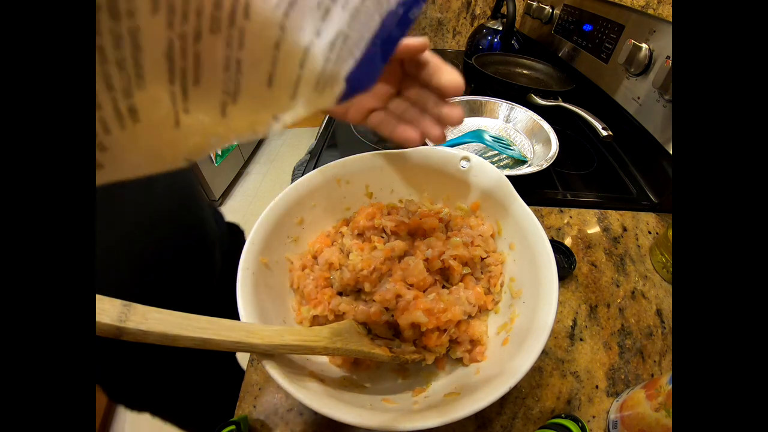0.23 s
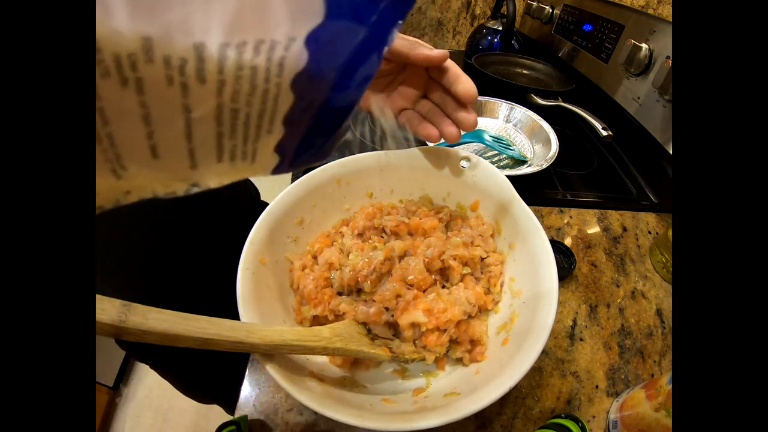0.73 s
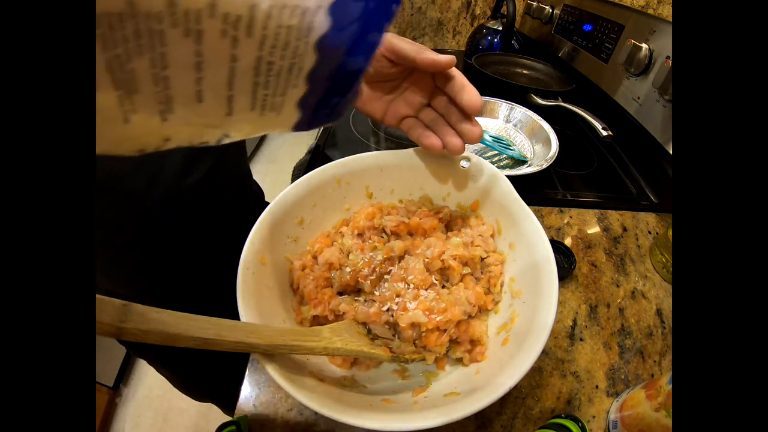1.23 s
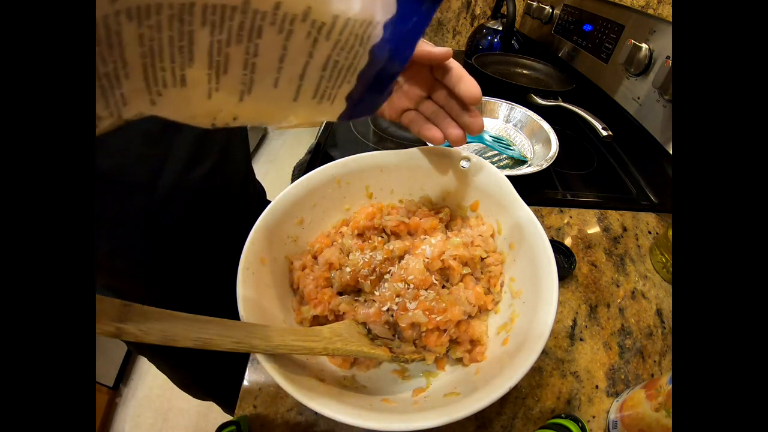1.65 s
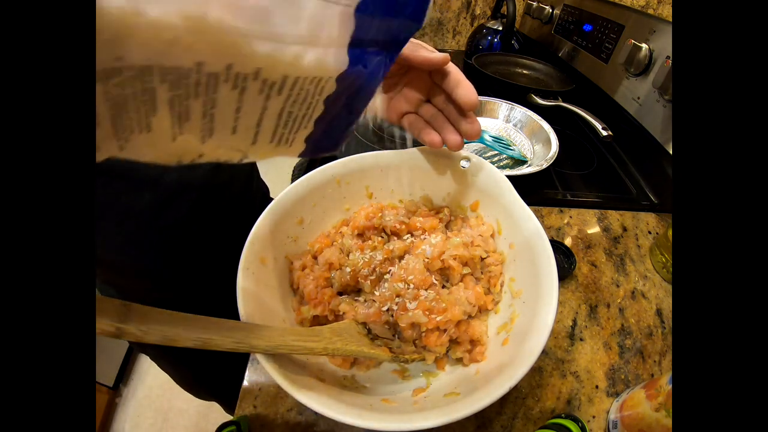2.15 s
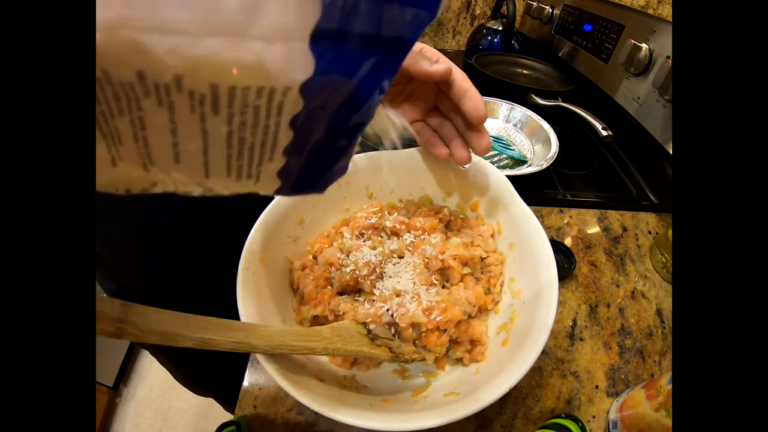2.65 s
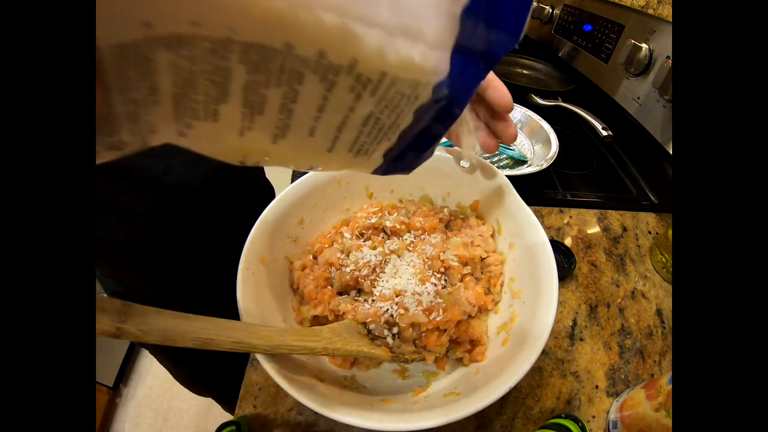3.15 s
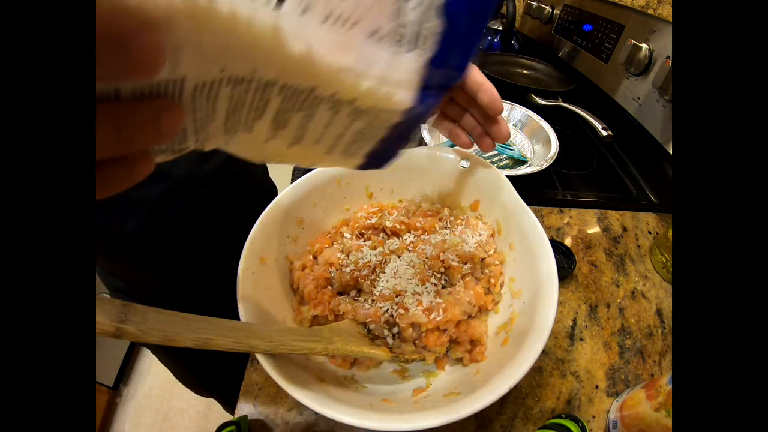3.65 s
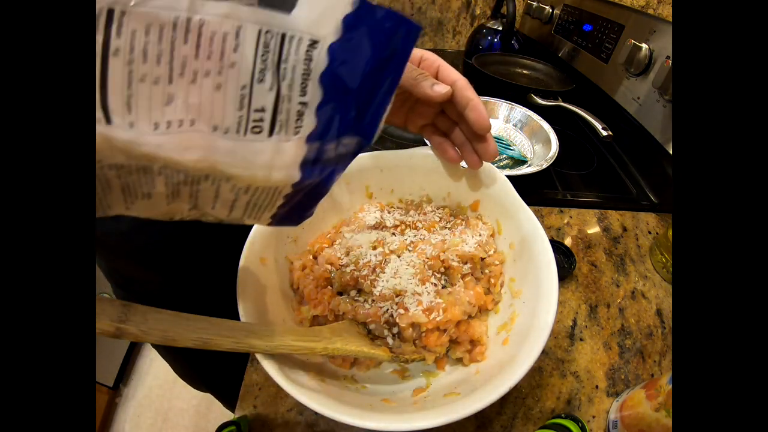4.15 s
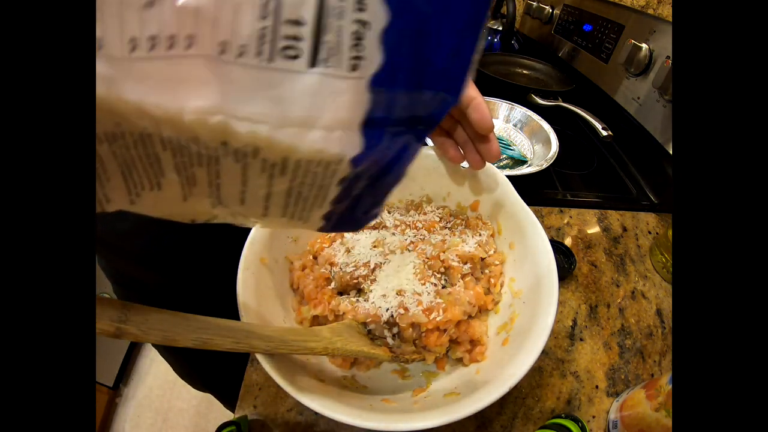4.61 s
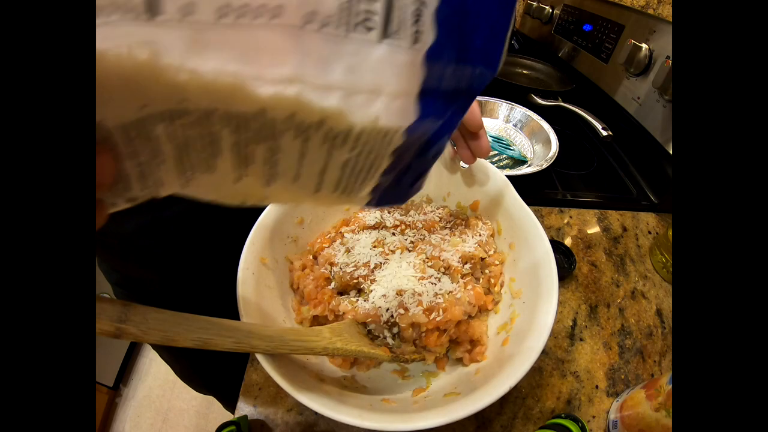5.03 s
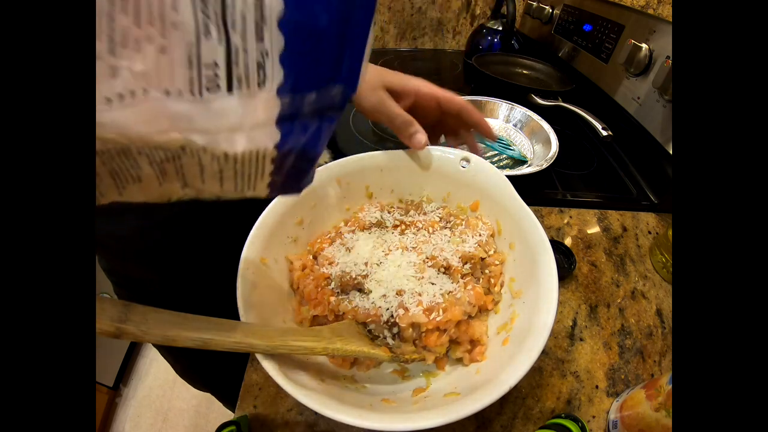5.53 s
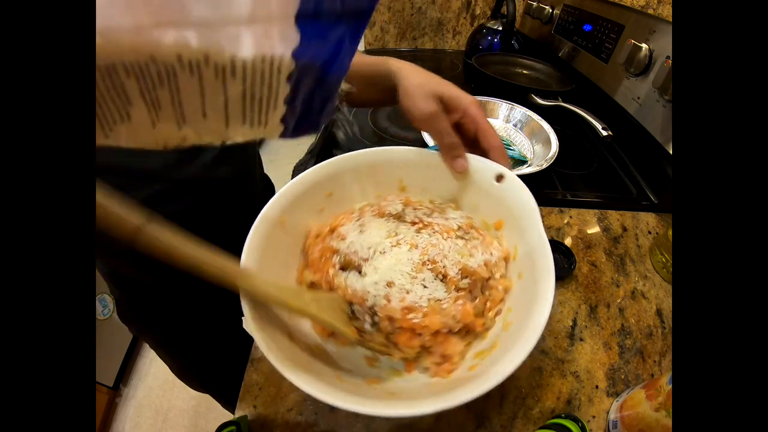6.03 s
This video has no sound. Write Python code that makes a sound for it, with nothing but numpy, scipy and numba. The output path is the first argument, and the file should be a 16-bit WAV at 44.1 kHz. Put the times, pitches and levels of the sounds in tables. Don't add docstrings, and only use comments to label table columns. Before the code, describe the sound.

Very close to a small stereo microphone, a stiff plastic bag of dry crumbs is shaken on the left: dense bright crackle, sharp snaps and a brief low handling rumble. It drifts toward the front and softens into lighter rustling and sprinkling. A low appliance drone swells and fades underneath. Late on, a crumb ticks the bowl rim, then a few small rattly clicks follow.

```python
import sys
import numpy as np
from scipy import signal
from scipy.fft import rfft, irfft, next_fast_len
from scipy.io import wavfile
from scipy.ndimage import uniform_filter1d, map_coordinates
from numba import njit

SR = 44100
rng = np.random.default_rng(int(sys.argv[2]) if len(sys.argv) > 2 else 0)


def master(y):
    cut = np.clip(np.atleast_2d(y).T, -1, 1)
    pcm = np.round(cut * 32767)
    wavfile.write(sys.argv[1], SR, pcm.astype(np.int16))


def convert_level_to_amplitude(level_db):
    exponent = np.asarray(level_db, float) / 20
    return 10 ** exponent


N = 276507
TIME = np.arange(N) / SR
SIZE = next_fast_len(N + 8192)
LOG_HZ = np.log(np.arange(SIZE // 2 + 1) * SR / SIZE + 1)
MIRROR = np.array([[1], [-1]])
STOP_S = 6.2495

# [start t/s, end t/s, start level/dB, end level/dB, big-fold share/dB]
POUR_TABLE = [(-.02, 0.07, -29.5, -37, 7), (0.066, 0.225, -33.5, -35.5, 2.5),
              (.242, 0.533, -36.5, -37, 1.5), (0.543, 0.86, -39, -40.5, 2.5), (0.834, 1.4, -41.5, -47, 3),
              (1.4, 1.762, -38, -45.5, 4.5), (1.763, 1.816, -47, -41.5, 2), (1.807, 1.906, -39, -38, 3.5),
              (1.936, 2.733, -43, -41.5, 1), (2.714, 2.873, -47.5, -49.5, -2),
              (2.946, 3.066, -55, -65, -0.5), (3.07, 3.338, -51.5, -49, 1), (3.354, 4.033, -50.5, -53, -1),
              (4.036, 4.527, -47, -47, -4), (4.53, 4.65, -52, -48.5, 0), (4.66, 4.811, -46.5, -44.5, 1.5),
              (4.805, 4.858, -51.5, -55, 8), (4.86, 4.984, -47.5, -52, -6),
              (4.962, 5.404, -42, -43.5, -0.5), (5.415, 5.686, -42, -49, -14),
              (5.682, 5.747, -53, -54, -21), (5.744, 5.847, -53, -45, -13), (5.855, 5.93, -43, -52.5, -2),
              (5.93, 6.025, -54.5, -51.5, 2), (6.026, 6.3, -46, -58, -0.5)]
# [t/s, peak level/dB, rise t/s per 10 dB, fall t/s per 10 dB]
JOLT_TABLE = [(.1, -33, 0.022, 0.34), (.15, -30.5, 0.059, 0.04), (.2, -32, 0.081, 0.026),
              (.305, -34, .01, 0.061), (.5, -34, .015, 0.025), (0.269, -27.5, 0.056, 0.075),
              (.45, -27.5, 0.072, 0.14), (.572, -28, 0.03, 0.044), (.69, -30.5, 0.033, 0.092),
              (.8, -34.5, 0.014, 0.042), (.93, -36, 0.046, 0.073), (1.044, -40, 0.076, 0.097),
              (1.13, -43.5, 0.066, 0.075), (1.99, -30, 0.073, 0.095), (2.09, -35.5, .04, 0.044),
              (2.13, -32.5, 0.06, 0.065), (2.228, -32, 0.034, 0.046), (2.243, -43, .015, .01),
              (2.348, -35, 0.056, 0.082), (2.422, -37, 0.023, 0.023), (2.49, -34.5, 0.025, 0.063),
              (2.624, -40.5, 0.049, 0.076), (3.1, -44.5, .02, 0.059), (3.21, -43.5, 0.22, 0.057),
              (3.379, -39.5, 0.014, 0.0046), (3.535, -34, 0.084, 0.022), (3.612, -38.5, 0.038, 0.027),
              (3.73, -35.5, 0.13, 0.38), (3.88, -40.5, 0.057, 0.023), (4.085, -41.5, 0.067, 0.035),
              (4.262, -42, 0.06, 0.056), (4.358, -39.5, 0.028, 0.18), (4.982, -49, .01, 0.027),
              (5.066, -41, 0.039, .01), (5.135, -37, 0.014, 0.055), (5.185, -38.5, .04, 0.013),
              (5.225, -42, .012, 0.045), (5.32, -41.5, 0.021, 0.071), (6.15, -44, 0.015, 0.32)]
# [t/s, hollow f/Hz, fine-crumb level/dB]
HOLLOW_TABLE = [(0, 3500, 1), (.15, 3700, 1.5), (.42, 3450, 1), (.47, 2570, 0.5), (.57, 3900, -0.5),
                (.64, 4500, 4), (.71, 2494, 0.5), (.81, 4100, 2), (.87, 3420, 0), (1.4, 2980, -1),
                (1.6, 3500, -0.5), (1.95, 2800, -0.5), (2.03, 3470, -1), (2.12, 3180, 0.5),
                (2.36, 3800, -0.5), (2.9, 3370, -1.5), (3.1, 2590, -0.5), (3.4, 3000, 1), (4.9, 3020, -1.5),
                (5.05, 3500, -3), (5.15, 3870, 1.5), (5.33, 3180, -3), (5.52, 3300, -0.5), (5.6, 3620, 1),
                (6.1, 2500, -4)]
# [t/s, peak level/dB, f/Hz, low thud level/dB]
SNAP_TABLE = [(0.055, -23, 4520, -24), (0.076, -16, 1450, -26), (0.0996, -15, 3130, -35),
              (0.2662, -17, 5740, -45), (0.548, -38, 3930, -34), (0.794, -20, 3800, -38),
              (0.836, -29, 3300, -24), (0.995, -26.5, 3250, -17.5), (1.0446, -13.5, 3320, -49),
              (1.118, -22, 4040, -45), (1.4836, -18, 3310, -39), (1.704, -29, 1240, -27),
              (1.8526, -26, 4070, -36), (1.991, -25, 2490, -41), (2.2198, -26.5, 3070, -15),
              (2.348, -28, 3700, -14.5), (2.4145, -43, 4000, -27), (2.473, -23, 3390, -35),
              (3.0924, -26, 2080, -39), (3.4512, -35.5, 2960, -14), (3.53, -17, 3600, -43),
              (3.6737, -18, 2680, -44), (3.884, -20, 2350, -47), (4.1867, -35, 3890, -30),
              (4.363, -27, 2780, -44), (4.977, -26, 1610, -44), (5.0456, -29, 3370, -37),
              (5.41, -29, 3200, -28), (5.461, -36, 2590, -40)]
# [t/s, peak level/dB]
CRACK_TABLE = [(.2404, -19), (.9052, -23), (1.2406, -28), (1.3907, -23), (1.5352, -22), (1.6226, -23),
               (1.7767, -35), (1.7993, -28), (1.94, -29), (2.3374, -22), (2.5757, -27), (2.592, -19),
               (2.6187, -23.5), (3.068, -23.5), (3.212, -19.5), (3.3624, -43.5), (3.4107, -21), (3.58, -24),
               (3.611, -34), (4.048, -37), (4.2397, -32), (4.5082, -27), (4.672, -27), (4.756, -25),
               (4.8647, -24.5), (5.088, -34), (5.1303, -19), (5.2165, -36), (5.357, -22), (5.7846, -32)]
# [t/s, peak level/dB, f/Hz]
POP_TABLE = [(0.0595, -23, 3700), (0.0758, -14, 3600), (0.1006, -12, 4400), (0.2543, -19, 3700),
             (0.2723, -19, 3000), (0.2756, -18, 2900), (0.3341, -21, 2800), (0.377, -23, 4700),
             (0.398, -23, 3800), (0.4013, -20, 3900), (0.4281, -20, 4800), (0.5095, -23, 3400),
             (0.5562, -21, 4200), (0.584, -21, 3400), (0.5952, -22, 4200), (0.638, -24, 5100),
             (0.7386, -23, 5100), (0.7649, -28, 4000), (0.7937, -23, 3800), (0.7978, -26, 3800),
             (0.8029, -26, 4000), (0.8103, -26, 3600), (0.9468, -27, 3100), (0.9537, -27, 3600),
             (0.959, -27, 2700), (0.9964, -30, 1700), (1.0411, -28, 3500), (1.0461, -26, 2500),
             (1.1188, -28, 3500), (1.1291, -27, 3300), (1.1858, -33, 3300), (1.24, -34, 3000),
             (1.2444, -35, 3500), (1.2984, -34, 2100), (1.3457, -34, 4000), (1.4848, -28, 5000),
             (1.5524, -29, 3300), (1.6239, -26, 4500), (1.6354, -28, 4200), (1.706, -30, 2100),
             (1.7361, -33, 2100), (1.7786, -32, 4700), (1.9911, -22, 2900), (2.1693, -28, 3700),
             (2.1839, -29, 3700), (2.2221, -29, 2300), (2.2601, -29, 3200), (2.3373, -16, 3600),
             (2.3501, -19, 3600), (2.4155, -33, 4400), (2.4737, -28, 3300), (2.5784, -28, 3300),
             (2.5924, -29, 4600), (2.6195, -27, 3300), (2.65, -30, 4000), (2.7258, -31, 4400),
             (2.7769, -37, 4700), (2.9165, -45, 4700), (3.0259, -39, 3100), (3.0694, -35, 4200),
             (3.0878, -35, 2500), (3.0942, -28, 2900), (3.1042, -31, 3000), (3.115, -33, 2700),
                 (3.1829, -33, 2900), (3.2134, -29, 4600), (3.2212, -30, 3500), (3.2393, -36, 3600),
                 (3.2453, -32, 3900), (3.2501, -37, 5100), (3.3443, -39, 5800), (3.3641, -34, 4000),
                 (3.3722, -34, 3800), (3.3787, -28, 5600), (3.4106, -29, 4700), (3.5304, -23, 3600),
                 (3.5815, -30, 2900), (3.6124, -28, 2600), (3.6742, -27, 4000), (3.7738, -26, 2600),
                 (3.8825, -27, 4400), (3.9131, -30, 3900), (4.1887, -33, 2800), (4.241, -34, 3400),
                 (4.3391, -32, 3300), (4.3625, -29, 4000), (4.4078, -30, 3800), (4.4263, -31, 3100),
                 (4.5088, -31, 3100), (4.608, -36, 4100), (4.6447, -39, 3700), (4.6746, -36, 5000),
                 (4.6947, -35, 3400), (4.7106, -34, 4600), (4.7572, -33, 3100), (4.7722, -35, 3000),
                 (4.7997, -35, 2100), (4.8112, -38, 3000), (4.9784, -33, 4500), (4.9848, -33, 2700),
                 (5.0471, -28, 3800), (5.0605, -32, 2600), (5.0674, -29, 3400), (5.089, -32, 3700),
                 (5.1117, -33, 3400), (5.1318, -25, 4000), (5.1367, -27, 4200), (5.1654, -28, 3200),
                 (5.36, -31, 3700), (5.3925, -33, 3200), (5.4612, -33, 3000), (5.7858, -36, 4500),
                 (6.1484, -33, 3100), (6.1581, -35, 2900), (6.1636, -35, 3300), (6.1689, -32, 2800)]
# [t/s, peak level/dB, f/Hz]
FOLD_TABLE = [(1.046, -37, 1370), (1.296, -38, 1360), (1.413, -29, 1750), (1.435, -38, 1030),
              (1.497, -37, 1410), (1.705, -31, 1300), (1.734, -44.5, 1970), (1.82, -33, 1960),
              (1.854, -36, 972), (1.887, -32, 695), (2.175, -38, 1290), (2.472, -37, 1400),
              (2.573, -35, 1830), (3.092, -35, 2000), (3.363, -49, 1690), (3.577, -36, 1650),
              (3.699, -37, 1840), (4.798, -34, 1500), (4.967, -37, 1620), (4.984, -38, 1670),
              (5.129, -37, 1590), (5.147, -37, 1650)]
# [t/s, f/Hz, level/dB, t60/s]
KNOCK_TABLE = [(.0757, 2600, -16, .002), (.0762, 1350, -15, .006), (5.7222, 2400, -38, .007),
               (.1003, 3500, -18, .005), (.1003, 4800, -19, .0045), (.1004, 6800, -17, .003),
               (.9955, 420, -30, .02), (2.2217, 680, -23, .02), (2.2217, 880, -27, .008),
               (2.2217, 1400, -29, .008), (2.2217, 400, -24, .02), (2.3495, 700, -30, .01),
               (2.4155, 300, -24, .03), (2.4155, 600, -23, .015), (3.0694, 7600, -35, .002),
               (3.2455, 7200, -36, .002), (3.3787, 7300, -30, .003), (3.4106, 8200, -30, .0015),
               (6.150, 2700, -33, .006), (6.1555, 2900, -37, .006), (6.159, 3400, -34, .004),
               (6.1625, 3300, -35, .005), (6.169, 2200, -38, .012), (6.183, 780, -38, .05),
               (6.1845, 2400, -33, .003), (6.1912, 2300, -33, .003), (6.2, 2300, -34, .004),
               (6.05, 2300, -42, .012), (6.09, 2200, -41, .015)]
# [t/s, position: 1 left, 0 front]
BAG_PATH = [
    (0, 1),
    (1.3, 1),
    (2.3, 0.66),
    (3.5, 0.28),
    (5, 0.29),
    (6.27, 0.1),
]
# [f/Hz, level/dB per Hz]
FILM_COLOUR = [(110, -12.5), (280, -7.5), (600, -4.5), (1100, 2), (1900, 6.5), (3300, 6.5), (5500, 5),
               (7300, 7.5), (8300, 3.5), (9400, 0), (10800, -9), (13500, -16), (15300, -22), (16500, -44)]
# [f/Hz, left-right level/dB from left, same from front, left lead/rad from left, same from front,
# direct share/0-1]
PORT_PAIR = [(150, 3, 0, 0, 0, .92), (450, 7, 1, .1, .2, .7), (800, 8, 2, -1, 0, .45),
             (1150, 9, 5, -1.8, -.6, .8), (2000, 7, 2, -1.3, -.4, .56), (4100, 4, 1, 0, 0, .87),
             (6000, 3, -1, 2, 1, .6), (8100, -2, -6, 3.1, 2.4, .5), (9000, 8, 4, 3.8, 3.2, .5),
             (12000, 4, 2, 5.3, 4, .35), (15000, 5, 3, 7.5, 5, .3)]
# [f/Hz, level/dB, t60/s]
RIM_MODES = [(2330, -38, .02), (3500, -32, .008), (4700, -33, .002), (5200, -26, .0007), (6000, -32, .002),
             (7700, -31, .004), (8700, -42, .015), (10500, -50, .001), (14700, -44, .001)]
# [t/s, level/dB, f/Hz, t60/s]
BUMP_TABLE = [(0.057, -43, 200, 0.17), (0.077, -34, 207, 0.12), (0.089, -36.5, 84.7, 0.16),
              (.1, -41, 270, .06), (0.171, -41, 32, 0.16), (3.7, -66, 65, .3), (5.49, -65, 75, .15)]
# [t/s, level/dB]
GRIP_TABLE = [(0.0, -57), (.088, -45.5), (.3, -52), (.45, -50.5), (.6, -53.5), (.706, -55.5)]
# [t/s, level/dB]
PUFF_TABLE = [(0.0, -69), (.19, -57), (.34, -59), (.54, -66), (.96, -61), (1.14, -63), (1.29, -66),
              (1.96, -75), (2.49, -71), (3.1, -83), (3.76, -80), (5.08, -84), (5.5, -81), (5.73, -84)]
# [f/Hz, level/dB per Hz, port likeness/0-1]
HISS_COLOUR = [(20, -16, 0.7), (60, -14, 0.6), (127, -14.5, 0.7), (258, -3, 0.98), (373, 0, 0.73),
               (520, -8.5, 0), (690, 1.5, 0), (990, -10.5, 0), (3020, -10, 0), (8000, -15, 0.7),
               (11500, -31, 0), (16000, -42, .1)]
# [t/s, level/dB]
DRONE_TABLE = [(.09, -63), (1.02, -68), (1.55, -64), (1.69, -60), (2.14, -58), (2.372, -59), (2.49, -55),
               (2.79, -54), (3.1, -58), (3.3, -62), (3.43, -52.5), (3.69, -57), (3.81, -53), (3.97, -52),
               (4.2, -57), (4.75, -62), (5.2, -77), (5.6, -67), (5.83, -61), (6.08, -57)]


def rustle(patch, moves, count=130000, gain_db=-7.5):
    scatter_db, rarest, patchy_db = 3.1, 0.011, 1.9
    taut_from_db, taut_per_db, slack_hz, slack_octaves = -38.5, -0.5, 2160, 0.52
    fold_per_jolt, crumb_per_jolt, crumb_per_db = 0.21, -0.13, 0.024
    hollow_db, hollow_per_jolt, hollow_octaves = 3.0, 0.17, 0.32

    when, pitch, luck, turn, stiff = rng.random((count, 5)).T
    cycles = 5 * 6.5 ** stiff ** 1.4
    row, column = when * (len(patch) - 1), np.sqrt(pitch) * (patch.shape[1] - 1)
    level_db, jolt_db, fold_db = moves[:, (when * N).astype(int)]
    t_s, hz = when * N / SR, (12 + 116 * pitch) ** 2
    fold = np.clip(np.log2(2000 / hz), 0, 1)
    crumb = np.clip(np.log2(hz / 5000) * 2, 0, 1)
    above_db = level_db - taut_from_db

    db = patchy_db * map_coordinates(patch, [row, column], order=1)
    db += level_db - scatter_db * np.log(luck + rarest)
    db += fold * (fold_db + fold_per_jolt * jolt_db)
    db += crumb * (2.5 + crumb_per_jolt * jolt_db + crumb_per_db * above_db)
    slack = np.exp(-(np.log2(hz / slack_hz) / slack_octaves) ** 2)
    db += taut_per_db * np.clip(above_db, 0, None) * slack

    shape_s, hollow_hz, fine_db = np.transpose(HOLLOW_TABLE)
    octaves = np.log2(hz / np.interp(t_s, shape_s, hollow_hz))
    db += (hollow_db + hollow_per_jolt * jolt_db) * np.exp(-(octaves / hollow_octaves) ** 2)
    db += crumb * np.interp(t_s, shape_s, fine_db)
    size = (hz / 3000) ** 0.75 * np.sqrt(11 / cycles)
    return ring(t_s, hz, cycles / hz, np.exp(2j * np.pi * turn) * convert_level_to_amplitude(db + gain_db) * size)


def patches(rate_hz, count, wake=0.14, linger=0.8):
    turn, size = rng.random((2, int(rate_hz * N / SR) + 2, count))
    awake = signal.lfilter([1], [1, -linger], (turn < wake) * (size + 1.2), axis=0)
    return (awake - awake.mean()) / awake.std()


def motion(time=TIME[::32]):
    edge_s, rest_db = 0.018, -62
    start, end, first_db, last_db, fold_db = np.transpose(POUR_TABLE)[:, :, None]
    on = np.clip(np.minimum(time - start, end - time) / edge_s + 0.5, 0, 1)
    pour_db = first_db + (last_db - first_db) * (time - start) / (end - start)
    power = on * convert_level_to_amplitude(2 * pour_db * (on > 0))
    slide = np.interp(TIME, time, power.sum(axis=0) + convert_level_to_amplitude(2 * rest_db))
    slide_db = 10 * np.log10(slide)
    both_db = 10 * np.log10(slide + swells(*np.transpose(JOLT_TABLE)))
    return both_db, both_db - slide_db, np.interp(TIME, time, np.sum(on * fold_db, axis=0))


def snaps(count=24, spread_s=0.0017, tail_db=-15, cycles=17.0, thud_hz=520):
    crack_hz, crack_thud_db = 3140, -61
    cracks = [(s, db, crack_hz, crack_thud_db) for s, db in CRACK_TABLE]
    s, peak_db, _, thud_db = np.transpose(SNAP_TABLE + cracks)
    s = s + 0.0008
    chance = rng.random((len(s), 3, count))
    lag = -spread_s * np.log(chance[:, 0])
    shed_hz = 1500 * 9 ** chance[:, 1]
    fade = np.exp(-lag / (2 * spread_s) + 2j * np.pi * chance[:, 2])
    shed = convert_level_to_amplitude(peak_db[:, None] + tail_db) * fade * shed_hz / 3000
    shed_s, hz = (s[:, None] + lag).ravel(), shed_hz.ravel()
    shower = ring(shed_s, hz, cycles / hz, shed.ravel())
    thud = ring(s + 0.00106, 0 * s + thud_hz, 0 * s + 0.0089, 1j * convert_level_to_amplitude(peak_db + thud_db + 26.0))
    return shower + thud


def pops(cycles=3.5, gain_db=4.5, edge_db=-7.0, edge=1.7, db_per_octave=4.0):
    s, db, hz = np.transpose(POP_TABLE)
    octaves = np.log2(hz / 3500)
    phase = np.exp(2j * np.pi * rng.random(len(s)))
    size = phase * convert_level_to_amplitude(db + gain_db + db_per_octave * np.clip(octaves, 0, 1))
    flick = size * convert_level_to_amplitude(edge_db + db_per_octave * octaves)
    return ring(s, hz, cycles / hz, size) + ring(s, edge * hz, cycles / hz, flick)


def folds(cycles=9.0, gain_db=5.5):
    s, db, hz = np.transpose(FOLD_TABLE)
    return ring(s + 0.00098, hz, cycles / hz, 1j * convert_level_to_amplitude(db + gain_db))


def knocks():
    s, hz, db, t60 = np.transpose(KNOCK_TABLE)
    dull = hz < 1800
    highpass = signal.butter(4, 1900, "high", fs=SR, output="sos")
    crisp = signal.sosfilt(highpass, ring(s, hz, t60, 1j * convert_level_to_amplitude(db) * ~dull))
    return crisp + ring(s, hz, t60, 1j * convert_level_to_amplitude(db) * dull)


def ports(shared, apart, clicks, scatter_t60=0.17, scatter_db=-8):
    direct = np.clip(over_hz(PORT_PAIR, axis=5), 0, 1)
    left = np.clip(np.interp(TIME, *np.transpose(BAG_PATH)), 0, 1)
    echo = rng.standard_normal((2, 4096)) * convert_level_to_amplitude(-60 * TIME[:4096] / scatter_t60)
    echo = convert_level_to_amplitude(scatter_db) * rfft(echo / np.linalg.norm(echo[0]), SIZE)
    mix = np.sqrt(direct) * rfft(shared + clicks, SIZE)
    mix = mix + np.sqrt(1 - direct) * rfft(apart, SIZE) + echo * rfft(clicks, SIZE)
    mix *= causal(over_hz(FILM_COLOUR, axis=1) - max(db for _, db in FILM_COLOUR))
    out, side = 0, MIRROR / 2
    for weight, column in ((left, 1), (1 - left, 2)):
        shadow = convert_level_to_amplitude(side * over_hz(PORT_PAIR, axis=column))
        lead = np.exp(1j * side * over_hz(PORT_PAIR, axis=column + 2))
        out = out + weight * irfft(mix * shadow * lead, SIZE)[:, :N]
    return out


def rim(strike_s=5.7196, tail_db=-37.5, tail_t60=0.05):
    hz, db, t60 = np.transpose(RIM_MODES)
    tick = ring(0 * hz + strike_s, hz, t60, 1j * convert_level_to_amplitude(db))
    tick = convert_level_to_amplitude(1.5) * uniform_filter1d(tick, size=3)
    bandpass = signal.butter(5, [2150, 16200], "band", fs=SR, output="sos")
    late = TIME - strike_s
    hiss = np.array([band(2100, 7900, order=2) for _ in range(2)])
    tail = hiss * (late > 0) * convert_level_to_amplitude(tail_db - 60 * np.abs(late) / tail_t60)
    return signal.sosfilt(bandpass, tick) + tail


def handling(lean_db=5.0, apart_db=-11.0):
    wind_filter_s, grip_floor_db, still_air_db = 0.752, -100, -85
    grip_rise_s, grip_fall_s = 0.04, 0.13
    puff_rise_s, puff_fall_s = 0.046, 0.045
    s, db, hz, t60 = np.transpose(BUMP_TABLE)
    bumps = ring(s, hz, t60, convert_level_to_amplitude(db) + 0j)
    grip = np.sqrt(swells(*np.transpose(GRIP_TABLE), grip_rise_s, grip_fall_s))
    grip = grip * np.clip((wind_filter_s - TIME) / 0.01, 0, 1) + convert_level_to_amplitude(grip_floor_db)
    rumble = grip * (band(51, 366) + convert_level_to_amplitude(apart_db) * band(51, 366) * MIRROR)
    puff = np.sqrt(swells(*np.transpose(PUFF_TABLE), puff_rise_s, puff_fall_s)) + convert_level_to_amplitude(still_air_db)
    air = puff * (band(16, 43) + convert_level_to_amplitude(apart_db) * band(16, 43) * MIRROR)
    return (bumps + rumble + air) * convert_level_to_amplitude(lean_db * MIRROR / 2)


def kitchen(apart_db=-11, hiss_db=-60):
    shaded_db, rise_s, fall_s = -62.5, 0.031, 0.09
    drone = band(150, 216, order=4) + convert_level_to_amplitude(apart_db) * band(152, 213, order=5) * MIRROR
    power = convert_level_to_amplitude(2 * shaded_db) + swells(*np.transpose(DRONE_TABLE), rise_s, fall_s)
    alike = np.clip(over_hz(HISS_COLOUR, axis=2), 0, 1)
    mid, side = rfft(rng.standard_normal((2, SIZE))) * convert_level_to_amplitude(over_hz(HISS_COLOUR, axis=1))
    pair = np.sqrt(1 + alike) * mid + np.sqrt(1 - alike) * side * MIRROR
    return level(irfft(pair, SIZE)[:, :N], hiss_db) + drone * np.sqrt(power)


@njit
def ring(start, hz, t60, size):
    out = np.zeros(N)
    for k in range(len(start)):
        p = np.exp((2j * np.pi * hz[k] - np.log(1000) / t60[k]) / SR)
        z = size[k]
        for i in range(int(start[k] * SR), min(N, int((start[k] + 0.8 * t60[k]) * SR))):
            z *= p
            out[i] += z.imag
    return out


def swells(s, db, rise_s, fall_s, time=TIME[::32]):
    late = time - s[:, None]
    rise = -late / np.reshape(rise_s, (-1, 1))
    fall = late / np.reshape(fall_s, (-1, 1))
    drop = np.where(late < 0, rise, fall)
    return np.interp(TIME, time, np.sum(convert_level_to_amplitude(2 * (db[:, None] - 10 * drop)), axis=0))


def band(low_hz, high_hz, order=3):
    bandpass = signal.butter(order, [low_hz, high_hz], "band", fs=SR, output="sos")
    return level(signal.sosfilt(bandpass, rng.standard_normal(N)), 0)


def level(x, db):
    return x * convert_level_to_amplitude(db) / np.sqrt(np.mean(x ** 2))


def over_hz(table, axis):
    rows = np.array(table, float)
    return np.interp(LOG_HZ, np.log(rows[:, 0]), rows[:, axis])


def causal(db):
    cepstrum = irfft(np.log(convert_level_to_amplitude(db)), SIZE)
    cepstrum[1:SIZE // 2] *= 2
    cepstrum[SIZE // 2 + 1:] = 0
    return np.exp(rfft(cepstrum))


def scene():
    patch, moves = patches(200, count=18), np.array(motion())
    shared, *apart = (rustle(patch, moves) for _ in range(3))
    clicks = snaps() + pops() + folds() + knocks()
    return ports(shared, np.array(apart), clicks) + handling() + kitchen() + rim()


def band_limit(x):
    return signal.sosfilt(signal.butter(12, 16490, fs=SR, output="sos"), x)


def record(dry):
    mix = dry * (TIME < STOP_S)
    return band_limit(mix)


dry = scene()
out = record(dry)
master(out)
```